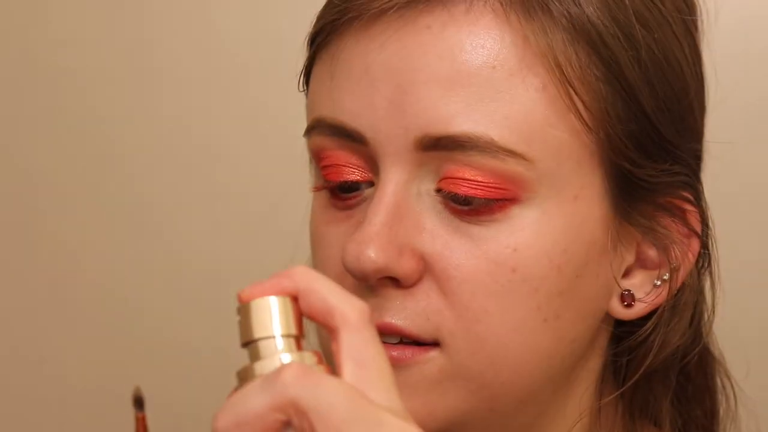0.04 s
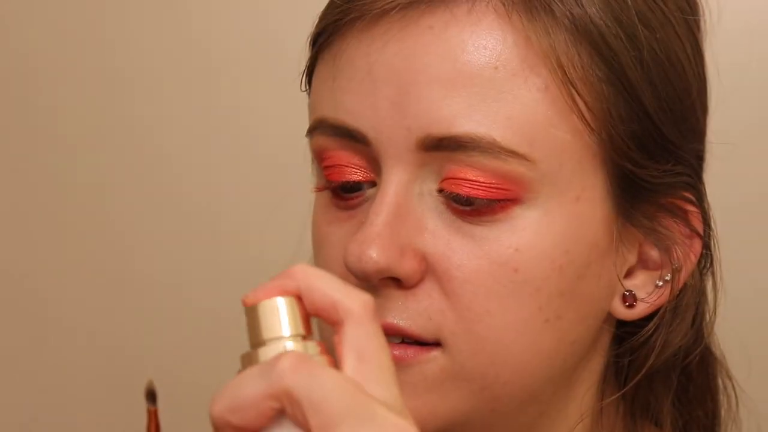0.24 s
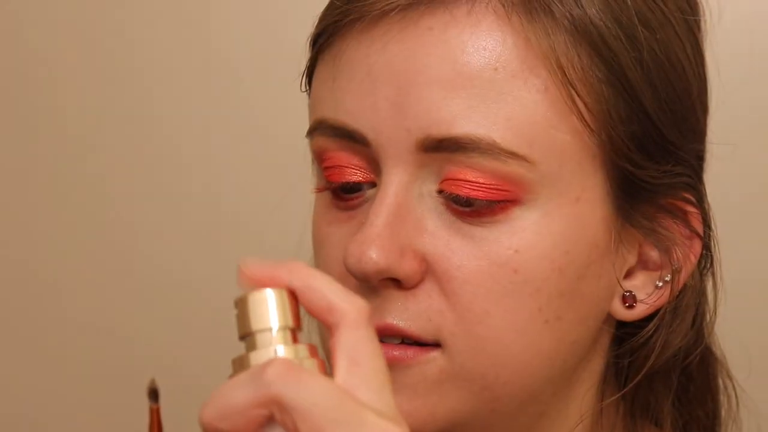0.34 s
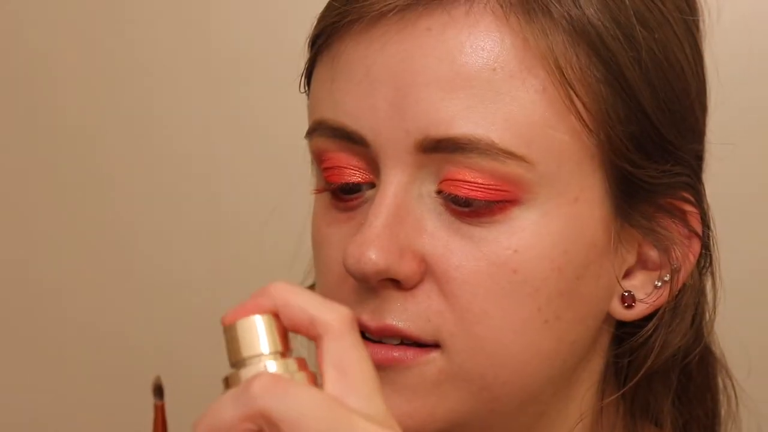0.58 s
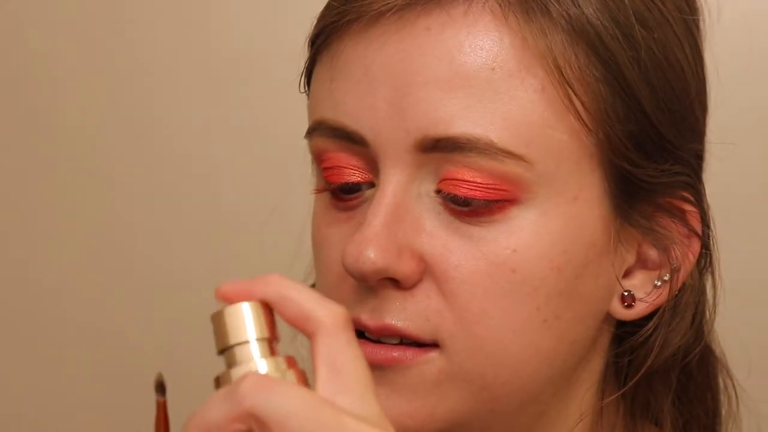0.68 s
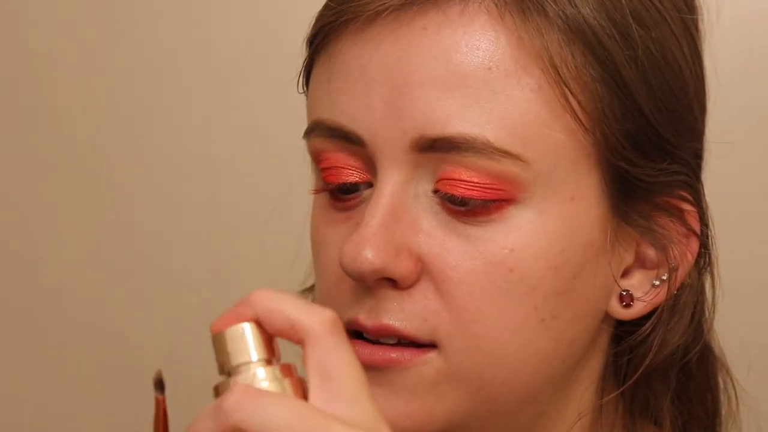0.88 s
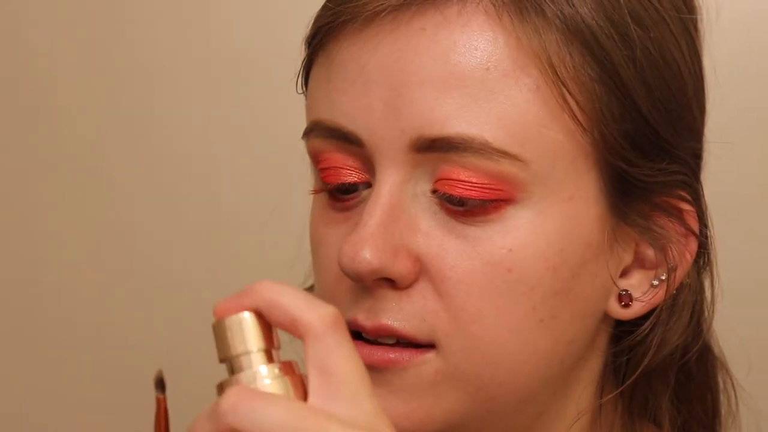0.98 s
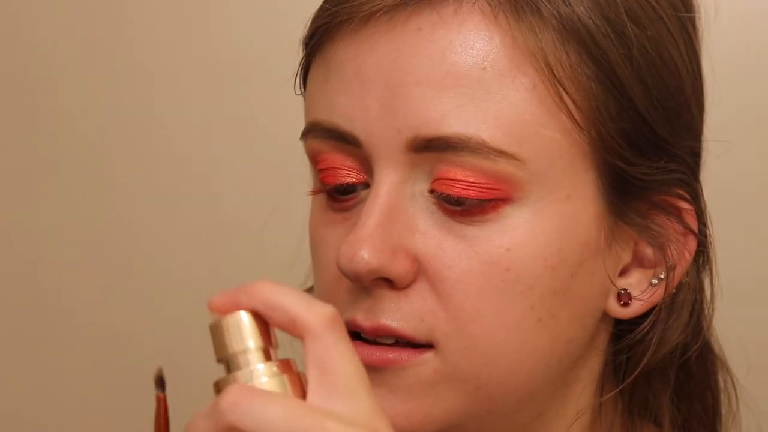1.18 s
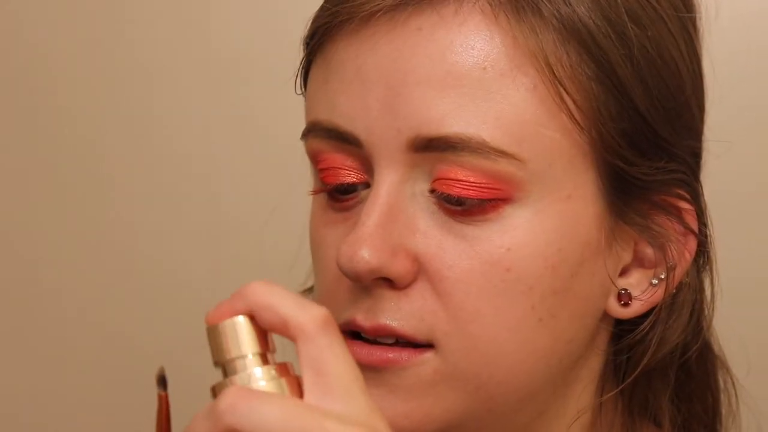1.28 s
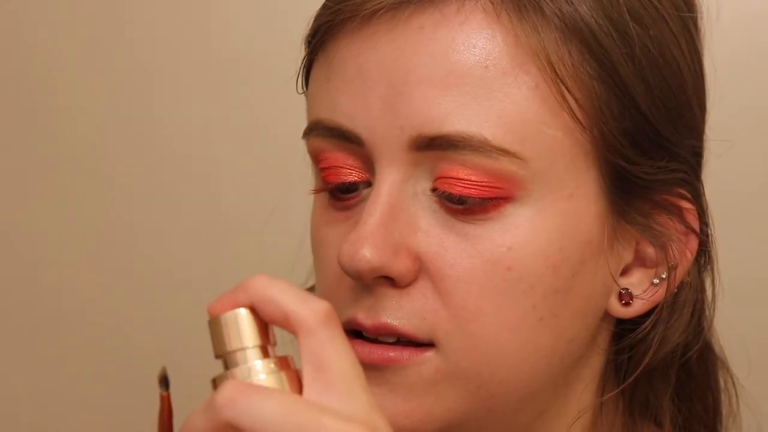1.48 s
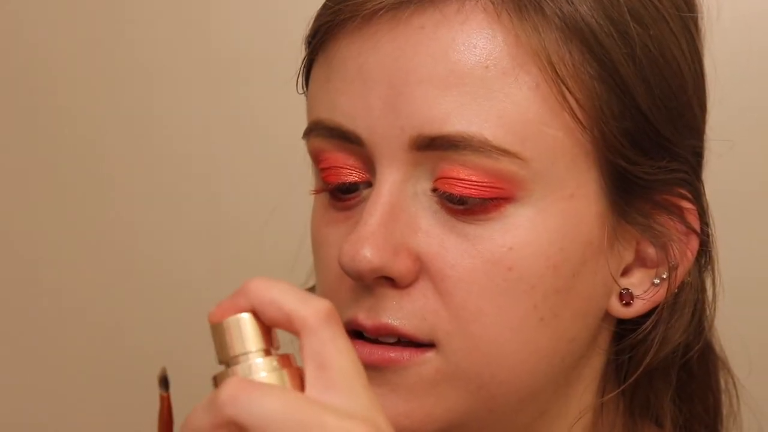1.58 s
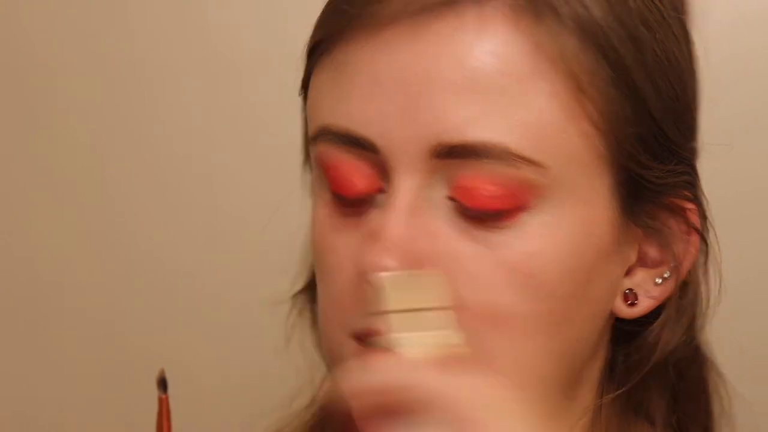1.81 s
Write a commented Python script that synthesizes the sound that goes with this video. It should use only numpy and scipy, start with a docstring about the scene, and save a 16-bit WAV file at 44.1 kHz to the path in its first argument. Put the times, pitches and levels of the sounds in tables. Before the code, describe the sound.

A small pump spray bottle gives six quick, clicking hisses of mist in a small room.

```python
"""A small pump spray bottle, close to the microphone in a small room, over a low ventilation hum.
A quarter second in, the first press knocks the pump head hard and lets out a short, wet hiss of mist.
The plunger springs back with a click and sucks the chamber full again. Five more presses follow
quickly, a refill before each, with softer knocks and finer mist. A tick of liquid and one faint knock
come last, and the room dies away into the hum."""
import sys
import numpy as np
from scipy import signal
from scipy.fft import rfft, irfft
from scipy.io import wavfile
from scipy.ndimage import uniform_filter1d, minimum_filter1d

SR = 44100
rng = np.random.default_rng(int(sys.argv[2]) if len(sys.argv) > 2 else 0)


def generate_wav(signal):
    """Clip the signal to [-1, 1] and save it as 16-bit WAV at the path in sys.argv[1]."""
    frames = np.transpose(np.atleast_2d(signal))
    scaled = np.clip(frames, -1, 1) * 32767
    pcm = np.round(scaled).astype(np.int16)
    wavfile.write(sys.argv[1], SR, pcm)


N = 81585
T = np.arange(N) / SR
TOP_HZ = 15900


def undb(db):
    """Decibels to gain."""
    return 10 ** (np.asarray(db) / 20)


def unit(x):
    """Scale to rms 1."""
    return x / np.sqrt(np.mean(x ** 2))


def colour(x, spectrum):
    """Filter by a spectrum of (freq_hz, level_db) points."""
    hz, db = np.array(spectrum).T
    bins_hz = np.maximum(np.fft.rfftfreq(2 * N, 1 / SR), 1)
    gain = undb(np.interp(np.log(bins_hz), np.log(hz), db))
    return irfft(rfft(x, 2 * N) * gain)[:N]


def noise(spectrum):
    """Coloured noise of rms 1."""
    return unit(colour(rng.standard_normal(N), spectrum))


def resonance(hz, width_hz):
    """Turbulence in one steep resonance, rms 1."""
    edges_hz = np.clip([hz - width_hz / 2, hz + width_hz / 2], 20, TOP_HZ)
    band = signal.butter(2, edges_hz, "band", fs=SR, output="sos")
    return unit(signal.sosfilt(band, rng.standard_normal(N)))


def wander(rate_hz):
    """Smooth random drift of rms 1."""
    size = int(SR / rate_hz)
    return unit(uniform_filter1d(uniform_filter1d(rng.standard_normal(N), size), size))


def since(start):
    """Seconds since a moment, zero before it."""
    return np.maximum(T - start, 0)


def flow(start, length, attack_s=0.00033, release_s=0.005):
    """Envelope of a valve that opens, holds and shuts."""
    return (1 - np.exp(-since(start) / attack_s)) * np.exp(-since(start + length) / release_s)


def ring(start, hz, t60_s):
    """One fading mode."""
    return np.sin(2 * np.pi * hz * since(start)) * np.exp(-np.log(1000) * since(start) / t60_s)


# Spectrum of the room's moving air: freq_hz, relative_db
AIR_SPECTRUM = [(20, -30), (35, -28), (43, -4), (70, -8), (120, -8), (180, -9), (300, -12.5), (450, -14),
                (800, -21.5), (1700, -21.5), (3000, -30.5), (16000, -36)]
# Tones of the hum: pitch_hz, level_db
HUM_TONES = [(44, -55), (119.5, -53.5), (177, -59.5), (436, -63)]


def ventilation():
    """Room tone behind the bottle: ventilation rumble with a wavering hum."""
    hum = sum(undb(db) * np.sqrt(2) * np.sin(2 * np.pi * hz * T + 0.5 * wander(rate_hz=2.7))
              for hz, db in HUM_TONES)
    return undb(-49) * noise(AIR_SPECTRUM) + hum


# Colour of the room's echoes: freq_hz, gain_db
ECHO_SPECTRUM = [(100, -47), (900, -3), (2500, 0.5), (5000, 3.5), (9000, -1), (16000, -6)]


def small_room(direct, delay_s=0.011, build_s=0.0071, split_hz=5700, echo_db=-8.5):
    """The direct sound reaches the microphone first; diffuse echoes build and fade, the treble sooner."""
    age = since(delay_s)
    tail = 0
    for side, t60_s in (("low", 0.29), ("high", 0.27)):
        band = signal.butter(3, split_hz, side, fs=SR, output="sos")
        tail += signal.sosfilt(band, rng.standard_normal(N)) * np.exp(-np.log(1000) * age / t60_s)
    tail *= 1 - np.exp(-age / build_s)
    tail = colour(tail / np.linalg.norm(tail), ECHO_SPECTRUM)
    return direct + undb(echo_db) * signal.fftconvolve(direct, tail)[:N]


# Faint ticks of liquid in the pump: start_s, level_db, pitch_hz
LIQUID_TICKS = [(.457, -48, 2500), (1.247, -45, 2450), (1.7137, -37.5, 2500)]


def liquid_ticks():
    """Liquid sets off small, rough rings of the chamber outside the strokes."""
    out = 0
    for start, db, hz in LIQUID_TICKS:
        roughness = resonance(hz, width_hz=660) * flow(start, 0.00071) / 2
        out += undb(db) * (ring(start, hz, t60_s=0.013) + roughness)
    return out


def valve_snap(start, decay_s=0.00056):
    """The bright, instant tick of the valve."""
    return resonance(10600, width_hz=4700) * (T > start) * np.exp(-since(start) / decay_s)


# Modes of the pump head and bottle: pitch_hz, level_db, t60_s
BOTTLE_MODES = [(720, -30, 0.036), (1000, -4.5, 0.019), (1762, -6.5, 0.019), (2155, -11, 0.015),
                (2880, -17, 0.024), (3770, -16.5, 0.022), (4460, -21, 0.028), (5930, -24, .008),
                (8500, -16, 0.01)]
# Spectrum of the crack of a blow: freq_hz, relative_db
CRACK_SPECTRUM = [(200, -72), (600, -48), (1000, 11.5), (2600, 7.5), (4200, -5.5), (6000, 4), (7300, -9),
                  (10000, 0.5), (16000, -40)]


def strike(start, rise_s, crack_db, crack_s):
    """A blow on the pump rings its modes and gives a brief crack of set energy."""
    modes = sum(undb(db) * ring(start, hz, t60_s) for hz, db, t60_s in BOTTLE_MODES)
    rise = 1 - np.exp(-since(start) / rise_s)
    burst = rise * np.exp(-since(start) / crack_s)
    crack = noise(CRACK_SPECTRUM) * burst
    crack *= np.linalg.norm(burst) / np.linalg.norm(crack)
    return modes * rise + undb(crack_db) * crack


# Returns of the plunger: start_s, click_db, chamber_hz, suction_s, suction_db, whistle_db, snap_db
PLUNGER_RETURNS = [(0.5034, -25.5, 2440, 0.019, -40.5, -55, -36.5),
                   (0.7873, -20.5, 2430, 0.022, -35, -61, -38),
                   (1.0656, -20.5, 2150, 0.028, -39.5, -60, -38),
                   (1.3142, -19.5, 2150, 0.038, -39, -65, -31),
                   (1.549, -19.5, 1870, 0.037, -39, -63, -33.5)]


def refills(sag_db_per_s=128):
    """The plunger clicks back, then draws liquid and air through the chamber with a thin whistle."""
    out = 0
    for start, click_db, chamber_hz, suction_s, suction_db, whistle_db, snap_db in PLUNGER_RETURNS:
        click = strike(start, rise_s=0.0001, crack_db=-5.5, crack_s=0.002)
        click += undb(-17) * ring(start, chamber_hz, t60_s=0.051)
        suction = resonance(chamber_hz, width_hz=430) + undb(-5.5) * noise(MIST_SPECTRUM)
        whistle = resonance(9250, width_hz=200)
        draw = undb(-sag_db_per_s * since(start)) * flow(start, suction_s)
        out += undb(click_db) * click + undb(snap_db) * valve_snap(start)
        out += draw * (undb(suction_db) * suction + undb(whistle_db) * whistle)
    return out


# Knocks of the pump head: start_s, level_db, lowpass_hz, pop_hz, chamber_hz, chamber_db
HEAD_KNOCKS = [(0.2438, 0, 5650, 910, 2374, -5), (0.5766, -9, 2730, 920, 2010, 3),
               (0.8522, -12, 2360, 1060, 1810, 2), (1.1244, -25.5, 2200, 990, 1810, 7),
               (1.3672, -29.5, 2200, 890, 1890, -12), (1.5977, -26, 1980, 970, 1890, -12),
               (1.7595, -31.5, 2650, 1060, 2360, 10.5)]


def head_knocks():
    """The pump head gives way, liquid pops out and the chamber rings briefly; soft blows are duller."""
    out = 0
    for start, db, lowpass_hz, pop_hz, chamber_hz, chamber_db in HEAD_KNOCKS:
        blow = strike(start, rise_s=0.0004, crack_db=2, crack_s=0.0013)
        pop = undb(-5) * ring(start, pop_hz, t60_s=0.012)
        chamber = undb(chamber_db) * ring(start, chamber_hz, t60_s=0.007)
        knock = signal.lfilter(*signal.butter(2, lowpass_hz, fs=SR), blow + pop + chamber)
        out += undb(db) * (knock + undb(-21.5) * valve_snap(start))
    return out


# Spectra of fine mist and of coarse drops, close to the nozzle: freq_hz, relative_db
MIST_SPECTRUM = [(200, -11.5), (700, -17), (1300, -3), (2000, -6.5), (2700, 2.5), (3500, -1), (4100, -1.5),
                 (4900, -8.5), (6300, -4.5), (7100, -16), (8500, -8.5), (10500, -12), (13000, -20),
                 (16000, -28)]
SPLUTTER_SPECTRUM = [(200, -40), (550, -14), (950, -6.5), (1550, -5.5), (2500, 0), (3400, -31),
                     (6000, -10.5), (16000, -22.5)]
# One puff for each press: start_s, length_s, mist_db, splutter_db, nozzle_db
PUFFS = [(0.243, 0.066, -31.5, -31, -41), (0.575, 0.066, -32, -33.5, -37.5),
         (0.85, 0.069, -32.5, -35.5, -39), (1.124, 0.05, -31.5, -43, -44.5),
         (1.369, 0.041, -32, -39.5, -43), (1.5978, 0.045, -31.5, -51, -42)]


def spray(flutter_db=1.3, flutter_hz=500, sag_db_per_s=56):
    """Mist hisses through the resonant nozzle; coarse drops splutter lower and thin out in each puff."""
    mist = noise(MIST_SPECTRUM) * undb(flutter_db * wander(flutter_hz))
    splutter = noise(SPLUTTER_SPECTRUM) * undb(flutter_db * wander(flutter_hz))
    nozzle = resonance(4000, width_hz=650)
    out = 0
    for start, length, mist_db, splutter_db, nozzle_db in PUFFS:
        drops = undb(splutter_db - sag_db_per_s * since(start)) * splutter
        out += flow(start, length) * (undb(mist_db) * mist + drops + undb(nozzle_db) * nozzle)
    return out


def scene():
    """One microphone close to the bottle, whose small body gives off almost no bass."""
    bass_cut = signal.butter(6, 623, "high", fs=SR, output="sos")
    bottle = spray() + signal.sosfilt(bass_cut, head_knocks() + refills() + liquid_ticks())
    return (small_room(bottle) + ventilation())[None]


def record(dry, ceiling=0.97, window_s=0.003):
    """After the microphone, a fast limiter holds the hardest knock near full scale; the top is cut."""
    size = int(window_s * SR)
    gain = ceiling / np.maximum(np.abs(dry), ceiling)
    gain = uniform_filter1d(minimum_filter1d(gain, size), size)
    top_cut = signal.ellip(10, 0.1, 80, TOP_HZ, fs=SR, output="sos")
    return signal.sosfilt(top_cut, dry * gain)


dry = scene()
out = record(dry)
generate_wav(out)
```